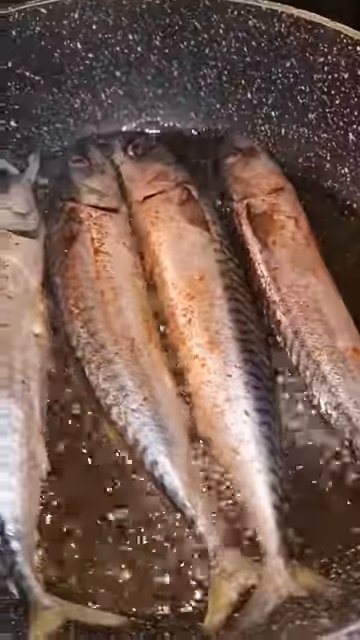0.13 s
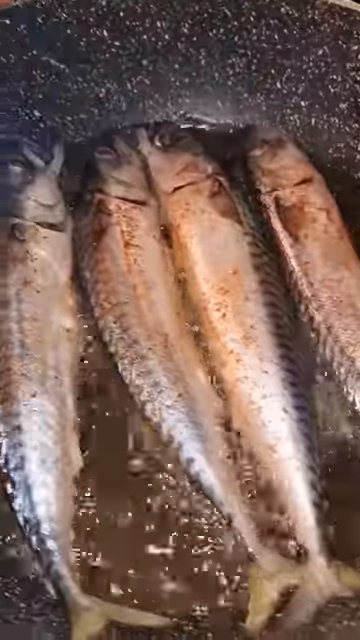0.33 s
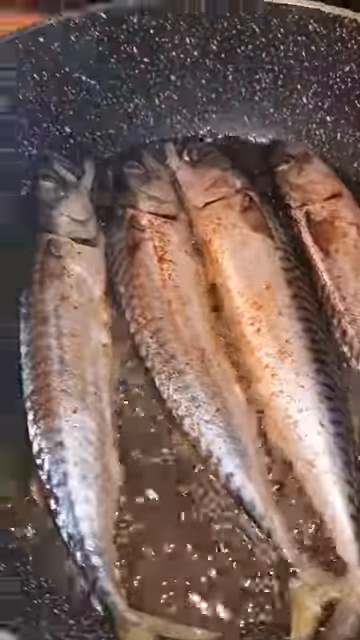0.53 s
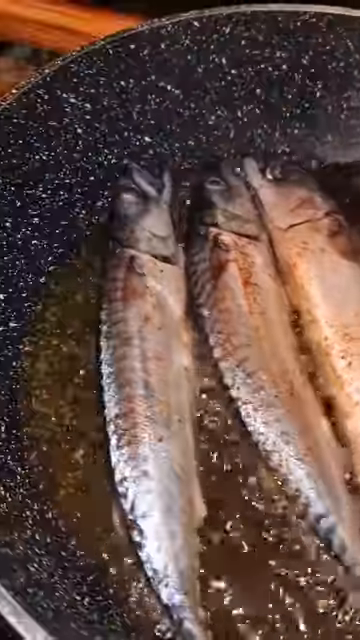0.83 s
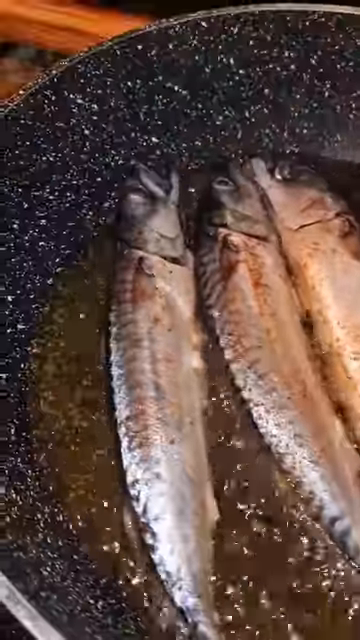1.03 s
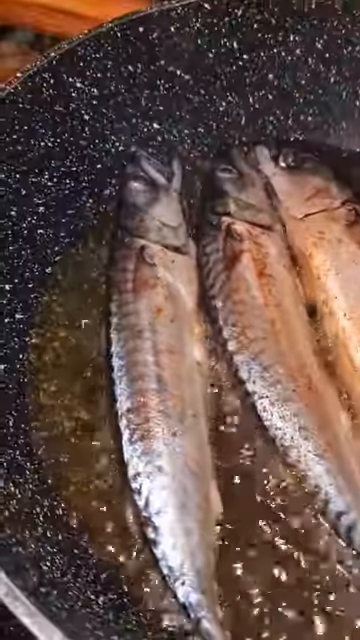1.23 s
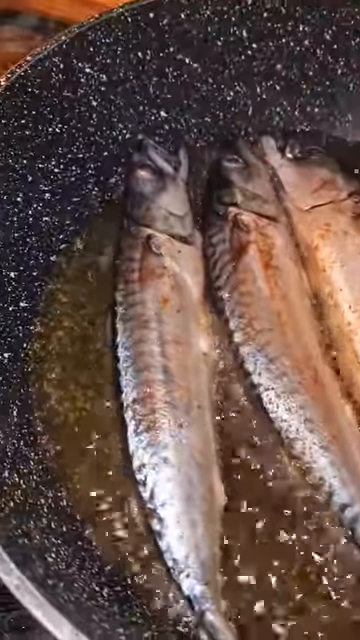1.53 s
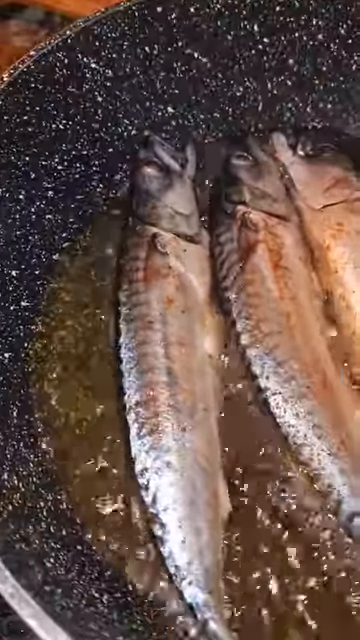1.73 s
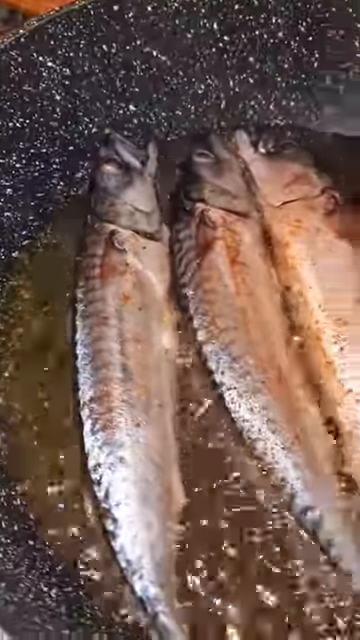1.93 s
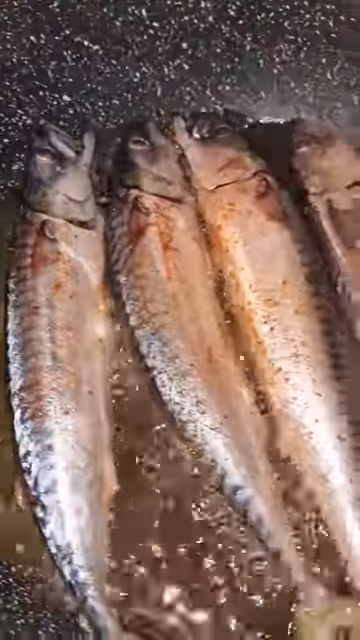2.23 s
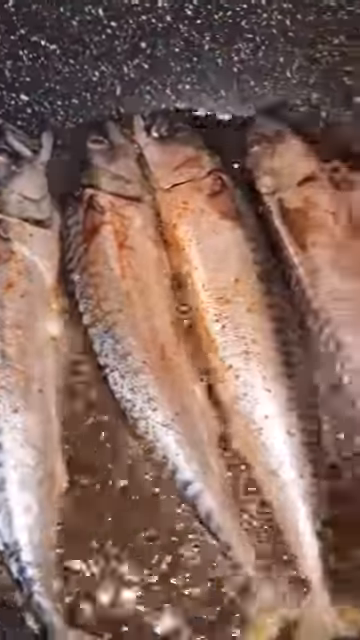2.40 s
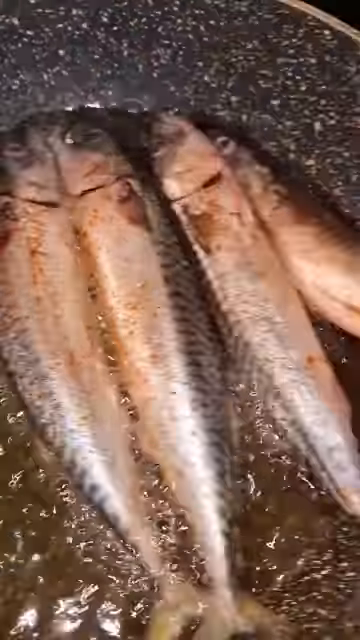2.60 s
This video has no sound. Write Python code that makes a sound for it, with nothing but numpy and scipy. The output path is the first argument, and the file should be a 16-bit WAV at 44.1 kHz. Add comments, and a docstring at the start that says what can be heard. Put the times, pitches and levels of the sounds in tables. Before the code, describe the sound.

Fish frying in hot oil sizzles densely and almost evenly throughout, bright and crackly, heard close in wide stereo. Short pitched bubble pops and sharp oil spits scatter over it, clustering around 0.5-1.1 s, with stronger pops near 1.4-1.9 s and 2.2-2.6 s. Dull low handling bumps occur around 0.2-0.4, 1.1 and 2.3 s, above faint room rumble, wavering hum and a short kitchen echo.

```python
"""A dense sizzle with pops runs throughout: whole fish fry in hot oil, close to a hand-held stereo microphone.
The sizzle is noise-like clicks of tiny steam bubbles bursting in flurries, each scattered by the pan.
Larger bubbles pop with a short pitch and set the pan ringing; now and then the oil spits with a sharp crack.
Dull bumps of handling, low room noise and a faint wavering hum lie underneath; the kitchen adds a short echo."""
import sys
import numpy as np
from scipy import signal
from scipy.fft import rfft, irfft, next_fast_len
from scipy.io import wavfile

SR = 44100
rng = np.random.default_rng(int(sys.argv[2]) if len(sys.argv) > 2 else 0)


def store_wav(level_fs):
    """Save 16-bit WAV to argv[1]."""
    pcm = np.round(np.clip(np.atleast_2d(level_fs), -1, 1) * 32767)
    wavfile.write(sys.argv[1], SR, pcm.T.astype(np.int16))


N = 121716  # length [samples]

# Event levels are relative: each kind of event also gets one overall gain.
# large steam bubbles: (time [s], level [dB], pitch [Hz], left minus right [dB])
LARGE_BUBBLES = [(0.018, -15, 1270, 9), (0.103, -15, 2350, 10), (0.135, -16, 1360, 9),
                 (0.189, -16.5, 1570, 6), (0.291, -16.5, 1070, 9), (0.364, -15.5, 1230, 10),
                 (0.482, -17, 2280, 8), (0.511, -13, 2140, 2), (0.532, -16, 2210, -2),
                 (0.5505, -15, 1320, 5), (0.574, -14, 1250, 4), (0.657, -14, 2270, -5),
                 (0.725, -12, 2200, 4), (0.727, -19, 1050, 0), (0.79, -17, 1770, 2.5), (0.85, -10, 2110, 3),
                 (0.894, -14.5, 2250, 0.0), (0.927, -11, 2120, 0), (0.957, -13.5, 2020, 6),
                 (0.968, -14, 2100, 1), (0.991, -16, 2280, 2), (1.014, -13, 2150, -3),
                 (1.05, -14.5, 1650, 11), (1.07, -11.5, 2200, 3.0), (1.377, -13.5, 2190, 4),
                 (1.432, -7, 2420, -6), (1.456, -10, 1400, 9), (1.573, -10, 2120, -2),
                 (1.652, -15, 2330, 2.0), (1.7, -10, 1450, 7), (1.715, -11.5, 2130, 1),
                 (1.728, -15, 2180, -2), (1.7385, -17.5, 1100, 5), (1.828, -15.5, 3170, 7),
                 (1.8712, -8, 1780, 10), (1.8725, -13.5, 1155, 10), (1.884, -16, 3050, 8),
                 (1.93, -18, 1000, 6), (2.12, -13.5, 2100, -1), (2.215, -8.5, 2850, -1),
                 (2.29, -16.5, 1750, 5), (2.302, -11.5, 2220, 2), (2.319, -16, 2810, 3),
                 (2.372, -15.5, 1400, 6), (2.414, -16, 862, 7), (2.4145, -20, 1630, 14),
                 (2.482, -22, 2870, 1.0), (2.483, -20, 930, 5), (2.568, -9, 1410, 2),
                 (2.626, -12.5, 2160, 4), (2.636, -27, 2280, 3.5), (2.656, -13.5, 2070, 8)]
# small bubbles bursting close by: (time [s], level [dB], pitch [Hz], left minus right [dB])
SMALL_BUBBLES = [(.078, -17.5, 4380, 12), (.104, -20, 7100, 12), (.14, -19, 4270, 6), (1.303, -18, 7800, 7),
                 (1.73, -29, 7500, 16), (1.85, -23, 6340, 3), (2.02, -22, 3780, 10), (2.077, -23, 4240, 1),
                 (2.237, -18.5, 5480, 0), (2.265, -21.5, 4030, 9), (2.366, -20, 7900, 10)]
# sharp spits of oil: (time [s], level [dB], centre [Hz], left minus right [dB], decay [s])
OIL_SPITS = [(0.112, -22, 5450, 3, 0.0099), (0.17, -20, 3200, 7, 0.0033), (0.1875, -22, 11500, 9, .003),
             (0.269, -23, 7500, 6, .005), (0.381, -16, 2780, -1, 0.0034), (0.39, -16.5, 5400, 8, .003),
             (0.5615, -14, 6400, 8.5, 0.0022), (0.642, -17, 4960, 7, 0.0047),
             (0.818, -18.5, 5000, 5, 0.0046), (0.83, -20, 9500, 3, 0.0033), (1.022, -22, 5500, 1.5, .003),
             (1.169, -22, 13000, 5, 0.0022), (1.6993, -16.5, 2670, 3, .003),
             (1.846, -17.5, 5500, 7, 0.0033), (2.037, -23, 12000, 3, .003), (2.2315, -25, 13500, 8, .003),
             (2.329, -23.5, 11400, 8, .002), (2.388, -23, 4500, 6, .003), (2.3994, -17, 11000, 6, 0.005),
             (2.421, -20, 7000, 4, .003)]
# dull bumps: (time [s], level [dB], centre of the blow [Hz], time to its peak [s], scuff [dB])
DULL_BUMPS = [(.012, -27, 302, 0.0039, -1), (.188, -29, 125, 0.0097, -2), (0.214, -15, 162, 0.0061, -4.5),
              (.243, -20, 175, .012, -9), (.298, -25, 135, 0.014, -8), (.348, -14, 229.5, 0.0086, -5),
              (0.38, -20.5, 58, 0.0035, 0.5), (.422, -19.5, 155, 0.0034, -8),
              (.69, -28.5, 91, 0.0099, -3.5), (.868, -24, 146, 0.013, 0.5), (1.025, -24.5, 170, .006, -2),
              (1.074, -20.5, 129, 0.0085, -1.5), (1.1, -17.5, 165, 0.01, 0.5), (1.125, -21, 215, .004, -1),
              (1.16, -21.5, 166, 0.0054, -6), (1.21, -19, 97, .013, -8), (1.371, -26.5, 98, 0.0075, 1),
              (1.512, -33, 147, 0.0058, -1), (2.015, -31.5, 218, 0.0054, -15),
              (2.273, -13, 169, 0.0024, -10.5), (2.593, -30, 397, 0.0039, -2)]
# what a bump rings with: (frequency [Hz], level [dB], time to fall 60 dB [s])
BUMP_MODES = [(50.3, -24, 0.22), (108, 7, 0.69), (187.3, 8.5, 0.55), (235, -32, 0.12), (303, 17.5, 0.28),
              (382, -11, .12), (500, 33, 0.087), (617, -33, .12)]
# ringing of the pan: (frequency [Hz], level [dB], time to fall 60 dB [s])
PAN_MODES = [(1177, -10, 0.032), (1540, -30, .02), (2197, -0.5, 0.027), (2550, 1, 0.01), (3220, -4, 0.023)]
# how hard the oil boils: (time [s], relative level [dB])
BOIL_CURVE = [(0.0, -25), (0.12, -24.5), (0.53, -26), (0.56, -24), (0.59, -26.5), (1.01, -26), (1.02, -24),
              (1.14, -28.5), (1.32, -25.5), (1.38, -27.5), (1.87, -26), (1.95, -28.5), (2.01, -26.5),
              (2.12, -27.5), (2.41, -25), (2.44, -27), (2.67, -25.5), (2.76, -26.5)]
# colour of the sizzle: (frequency [Hz], relative gain [dB])
SIZZLE_COLOUR = [(100, -15), (450, -20), (750, -15), (1150, -0.5), (1700, -5), (2200, 0.5), (3100, 1),
                 (3800, -2.5), (5500, -1), (7600, -3.5), (8700, -4.5), (10000, -10), (12000, -8.5),
                 (14800, -10), (16000, -46)]
# colour of the scuff in a bump: (frequency [Hz], relative gain [dB])
SCUFF_COLOUR = [(30, -17), (70, -0.5), (110, 2.5), (280, 0), (450, -8.5), (650, -2.5), (900, -7),
                (2000, -51)]
# colour of the kitchen's low noise: (frequency [Hz], relative gain [dB])
RUMBLE_COLOUR = [(20, -30), (50, -2), (75, -13), (100, -12), (130, 4.5), (180, -15.5), (260, -2.5),
                 (500, -9), (900, -24), (3000, -52)]
# strength of the pitched bubbles: (pitch [Hz], relative level [dB])
BUBBLE_STRENGTH = [(720, -2.5), (1150, 0.5), (1600, 2), (2150, 2.5), (2600, 2), (3000, 10)]
# strength of the higher, ticking bubbles: (pitch [Hz], relative level [dB])
TICK_STRENGTH = [(3200, 3.5), (4500, 0), (6000, -2), (7600, 3), (9000, -2), (10500, -17.5), (14000, -7.5)]
# lean of the microphone pair: (frequency [Hz], left minus right [dB])
MIC_LEAN = [(250, 0), (480, 0.3), (750, 6.5), (1400, 4.9), (2100, 1.2), (3000, -.5), (3700, 4), (5200, 1.1),
            (7000, 2.4), (9500, 3.3), (12000, 3.3), (15000, 7)]
# likeness of the two channels: (frequency [Hz], likeness [0-1])
MIC_LIKENESS = [(200, 0.97), (700, 0.37), (1200, 0.28), (2200, 0.18), (4000, 0.061), (8000, 0.013)]

# A spread is how many dB a burst grows per unit of its random size.
LARGEST_SIZE = 3  # cap on that random size
FIZZ_PER_S, FIZZ_SPREAD_DB, FIZZ_DB = 9000, 2, 1
CRACKLE_PER_S, CRACKLE_SPREAD_DB, CRACKLE_DB = 640, 4, -2.5
FLURRY_S, FLURRY_DB, SCATTER_S = 0.014, 1.5, 0.0015
# cycles: how many a bubble rings for until it has died to about a third
BUBBLES_PER_S, BUBBLE_SPREAD_DB, BUBBLE_DB, BUBBLE_CYCLES = 750, 3.5, -5.5, 2.7
TICKS_PER_S, TICK_SPREAD_DB, TICK_DB, TICK_CYCLES = 1400, 3.5, -2.5, 4.2
BUBBLE_RISE_S, GRAIN_SCATTER_S = 0.0005, 0.00078
LOW_CUT_HZ = 180  # small bubbles radiate little bass
WALL_S, WALL_SHARE = 0.001722, 0.14  # echo off the side of the pan
SPLASH_S, SPLASH_DB = 0.0032, -3.5
SPLASH_FALL_DB = 6  # per octave away from the bubble's pitch
SPUTTER_S, SPUTTER_DB = 0.005, -9  # quieter bubbles follow a pop within this time
SPUTTER_OCTAVES = 0.5  # how far their pitch strays, up or down
SPIT_DB, SPIT_FALL_DB = -1.5, 6  # level, and fall one octave from the centre
BUMP_DB, BUMP_RING_DB = -5.5, -10
BUMP_ROOM_DB, BUMP_ROOM_T60_S = -11.5, 0.12
POP_RING_DB, PAN_DB = -8, -19.5  # pan ringing under large pops, and under all other oil sounds
ROOM_DB, ROOM_T60_S = -6.5, 0.13
SPOT_S = 0.02  # the bursting moves to another spot of the pan this often
RUMBLE_DB, HUM_HZ, HUM_DB = -46.5, 99.5, -50
SWELL_S, SWELL_DB = 0.09, 2.2  # the background rises and sinks
NOTCH_HZ, NOTCH_WIDTH_HZ, NOTCH_DB = 11170, 230, -20  # dip in the right microphone port
MIC_LOW_HZ, EDGE_HZ = 39.3, 15550


def amp(db):
    """Turns decibels into a gain."""
    return 10 ** (np.asarray(db) / 20)


def evened(x):
    """Scales a sound to an rms (average strength) of 1."""
    return x / np.sqrt(np.mean(x ** 2) + 1e-20)


def read(points, hz):
    """Reads a table between its points, on a log-frequency axis."""
    f, value = np.transpose(points)
    return np.interp(np.log(hz + 1), np.log(f + 1), value)


def level(curve):
    """Turns a dB curve over time into a gain for every sample."""
    return amp(np.interp(np.arange(N) / SR, *np.transpose(curve)))


def add(mix, s, sound):
    """Mixes a sound in at a time in seconds, cut off at the end of the mix."""
    start = max(round(s * SR), 0)
    part = mix[:, start:][:, :sound.shape[-1]]
    part += sound[..., :part.shape[1]]


def panned(db):
    """Gives left and right gains for a level difference."""
    return amp(np.array([[db], [-db]]) / 2)


def through(x, response):
    """Passes each channel through a response by convolution."""
    return signal.fftconvolve(np.atleast_2d(x), np.atleast_2d(response), axes=1)[:, :N]


def coloured(x, db_at):
    """Filters by a gain in dB given as a function of frequency."""
    length = x.shape[-1]
    size = next_fast_len(2 * length)
    gain = amp(db_at(np.fft.rfftfreq(size, 1 / SR)))
    return irfft(rfft(x, size) * gain, size)[..., :length]


def ports(hz):
    """Gain in dB of the two microphone ports towards the pan."""
    half_lean = read(MIC_LEAN, hz) / 2
    notch = NOTCH_DB * np.exp(-((hz - NOTCH_HZ) / NOTCH_WIDTH_HZ) ** 2)
    return np.array([half_lean, notch - half_lean])


def low_cut(hz):
    """Gain in dB of the bass roll-off of a bubble."""
    return -10 * np.log10(1 + (LOW_CUT_HZ / (hz + 1)) ** 8)


def noise_pair(size):
    """Stereo noise, alike in the bass and nearly unrelated in the treble."""
    a, b = rfft(rng.standard_normal((2, size)))
    same = np.clip(read(MIC_LIKENESS, np.fft.rfftfreq(size, 1 / SR)), -1, 1)
    right = same * a + np.sqrt(1 - same ** 2) * b
    return irfft(np.array([a, right]), size)


def scatter(decay_s, size=1024):
    """A dying cluster of reflections, with unit energy in each channel."""
    x = noise_pair(size) * np.exp(-np.arange(size) / SR / decay_s)
    return x / np.linalg.norm(x, axis=1, keepdims=True)


def wander(span_s):
    """Smooth chance that changes over about span_s seconds."""
    return evened(coloured(rng.standard_normal(N), lambda hz: -10 * np.log10(1 + (2 * hz * span_s) ** 4)))


def bursts(per_s, spread_db):
    """Randomly timed clicks, most small and a few large, pushing either way."""
    size = np.minimum(rng.exponential(1, N), LARGEST_SIZE)
    happens = rng.random(N) < per_s / SR
    return happens * amp(spread_db * size) * rng.choice([-1, 1], N)


def ring(modes, size=16384):
    """Response of a body that rings at several frequencies, with unit energy."""
    t = np.arange(size) / SR
    x = sum(amp(db - 60 * t / t60) * np.sin(2 * np.pi * hz * t) for hz, db, t60 in modes)
    return x / np.linalg.norm(x)


def sizzle(per_s, spread_db, level_db, count=20):
    """Tiny bubbles burst in flurries at many spots; the pan scatters each click."""
    flurry = amp(FLURRY_DB * wander(FLURRY_S))
    x = np.zeros((2, N))
    for _ in range(count):
        clicks = bursts(per_s / count, spread_db) * flurry
        x += through(clicks, scatter(SCATTER_S))
    x = coloured(x, lambda hz: read(SIZZLE_COLOUR, hz) + ports(hz))
    return evened(x) * amp(level_db) * level(BOIL_CURVE)


def bubble(hz, cycles, size=1024):
    """An opened bubble rings for a few cycles and echoes off the side of the pan."""
    t = np.arange(size) / SR
    envelope = (1 - np.exp(-t / BUBBLE_RISE_S)) * np.exp(-t * hz / cycles)
    tone = envelope * np.sin(2 * np.pi * hz * t)
    x = tone + WALL_SHARE * np.interp(t - WALL_S, t, tone, left=0)
    return x / abs(x).max()


def bubbling(sizes, per_s, spread_db, cycles, clump_s, clump_db, count=7):
    """A patter of pitched bubbles; those of like size come in clumps of their own."""
    out = np.zeros((2, N))
    pitches = np.geomspace(sizes[0][0], sizes[-1][0], count * count)
    for group in pitches.reshape(count, count):
        clump = amp(clump_db * wander(clump_s))
        for hz in group:
            grain = evened(through(bubble(hz, cycles), scatter(GRAIN_SCATTER_S)))
            clicks = clump * bursts(per_s / count ** 2, spread_db)
            out += amp(read(sizes, hz)) * through(clicks, grain)
    return evened(coloured(out, lambda hz: ports(hz) + low_cut(hz)))


def pops(rows, cycles, level_db, count=3):
    """Single bubbles: a short pitched pop, a splash of oil and a sputter of quieter bubbles."""
    out = np.zeros((2, N))
    chances = rng.random((len(rows), count, 2))
    for (s, db, hz, lean_db), chance in zip(rows, chances):
        gain = amp(db + level_db) * panned(lean_db)
        splash = coloured(
            scatter(SPLASH_S),
            lambda f: read(SIZZLE_COLOUR, f) - SPLASH_FALL_DB * abs(np.log2((f + 1) / hz)))
        splash = amp(SPLASH_DB) * splash / abs(splash).max()
        add(out, s, gain * (bubble(hz, cycles) + splash))
        for late, detune in chance:
            pitch = hz * 2 ** (SPUTTER_OCTAVES * (2 * detune - 1))
            add(out, s + late * SPUTTER_S, gain * amp(SPUTTER_DB) * bubble(pitch, cycles))
    return out


def spits():
    """Drops of water flash to steam with a short crack, some dull and some very bright."""
    out = np.zeros((2, N))
    for s, db, hz, lean_db, decay_s in OIL_SPITS:
        crack = coloured(scatter(decay_s), lambda f: -SPIT_FALL_DB * np.log2((f + 1) / hz) ** 2)
        strength = crack[:, :round(decay_s * SR)].std()
        add(out, s, amp(db + SPIT_DB) * panned(lean_db) * crack / strength)
    return out


def in_pan(x, ring_db):
    """Adds the ringing that a sound excites in the pan."""
    return x + amp(ring_db) * x.std() * evened(through(x, ring(PAN_MODES)))


def kitchen(x, count=8):
    """The short echo of the room, different for each spot in the pan, with fades between spots."""
    spot = np.arange(N) / SR / SPOT_S
    out = np.zeros((2, N))
    for k in range(count):
        away = abs((spot - k + count / 2) % count - count / 2)
        share = np.cos(np.pi / 2 * np.minimum(away, 1))
        out += through(x * share, scatter(ROOM_T60_S / np.log(1000), size=8192))
    return out


def bumps(size=8192):
    """Soft blows of handling: a low push with a scuff, ringing briefly and booming in the room."""
    out, t = np.zeros((2, N)), np.arange(size) / SR
    for s, db, hz, peak_s, scuff_db in DULL_BUMPS:
        push = t / peak_s * np.exp(1 - t / peak_s)
        scuff = evened(coloured(noise_pair(size), lambda f: read(SCUFF_COLOUR, f)))
        blow = push * (np.sin(2 * np.pi * hz * t) + amp(scuff_db) * scuff)
        body = through(blow, ring(BUMP_MODES))[:, :size]
        ringing = amp(BUMP_RING_DB) * blow.std() * evened(body)
        add(out, s, amp(db + BUMP_DB) * (blow + ringing))
    boom = through(out, scatter(BUMP_ROOM_T60_S / np.log(1000), size=16384))
    boom = coloured(boom, lambda f: read(RUMBLE_COLOUR, f))
    return out + amp(BUMP_ROOM_DB) * out.std() * evened(boom)


def background():
    """Low room noise that swells unevenly, and a hum that wavers in phase and level."""
    phase = 2 * np.pi * HUM_HZ * np.arange(N) / SR + 0.93 * wander(0.048)
    hum = np.sin(phase) * amp(SWELL_DB * wander(SWELL_S))
    rumble = coloured(noise_pair(N), lambda hz: read(RUMBLE_COLOUR, hz))
    rumble = rumble * amp(SWELL_DB * wander(SWELL_S))
    return amp(RUMBLE_DB) * evened(rumble) + amp(HUM_DB) * evened(hum)


def scene():
    """The frying, the pan's ring and the kitchen's short echo, over bumps and background."""
    bubbles = amp(BUBBLE_DB) * bubbling(
        BUBBLE_STRENGTH, BUBBLES_PER_S, BUBBLE_SPREAD_DB, BUBBLE_CYCLES, clump_s=0.0091, clump_db=0.5)
    ticks = amp(TICK_DB) * bubbling(
        TICK_STRENGTH, TICKS_PER_S, TICK_SPREAD_DB, TICK_CYCLES, clump_s=0.042, clump_db=2.5)
    patter = level(BOIL_CURVE) * (bubbles + ticks)
    fizz = sizzle(FIZZ_PER_S, FIZZ_SPREAD_DB, FIZZ_DB)
    crackle = sizzle(CRACKLE_PER_S, CRACKLE_SPREAD_DB, CRACKLE_DB)
    hiss = fizz + crackle
    large = pops(LARGE_BUBBLES, cycles=2.4, level_db=-3.5)
    pings = pops(SMALL_BUBBLES, cycles=8.6, level_db=3.5)
    small = patter + hiss + pings + spits()
    oil = in_pan(large, POP_RING_DB) + in_pan(small, PAN_DB)
    return oil + amp(ROOM_DB) * kitchen(oil) + bumps() + background()


def record(dry):
    """The microphone's bass roll-off and the recorder's upper band limit."""
    bass_cut = signal.butter(3, MIC_LOW_HZ, "highpass", fs=SR, output="sos")
    band_limit = signal.firwin(511, EDGE_HZ, window=("kaiser", 9), fs=SR)
    x = signal.sosfilt(bass_cut, dry)
    return signal.oaconvolve(x, band_limit[None], "same")


dry = scene()
out = record(dry)
store_wav(out)
```